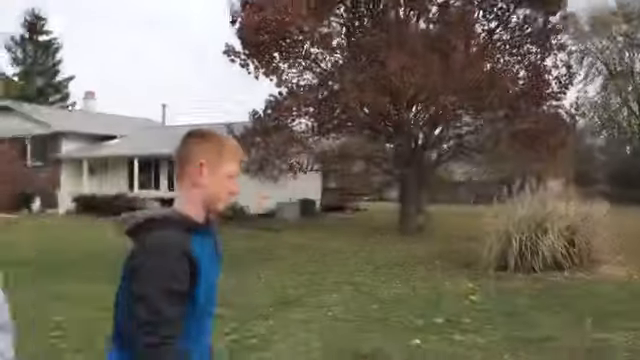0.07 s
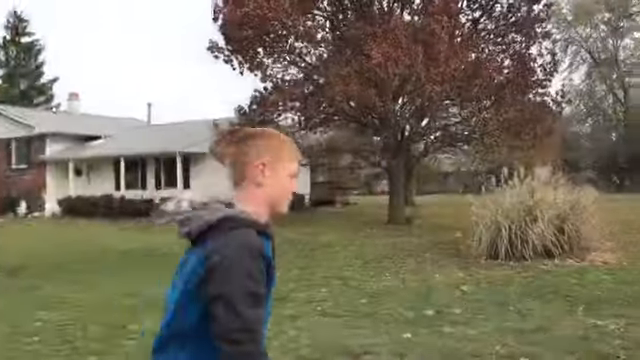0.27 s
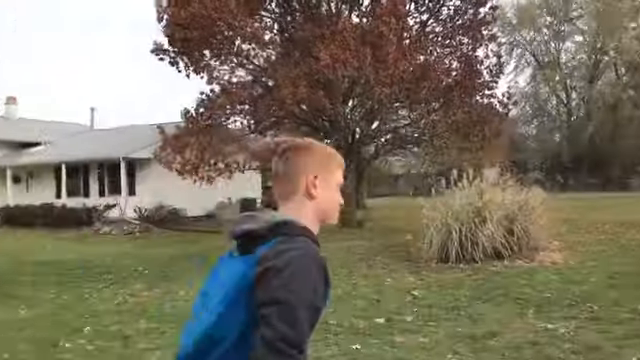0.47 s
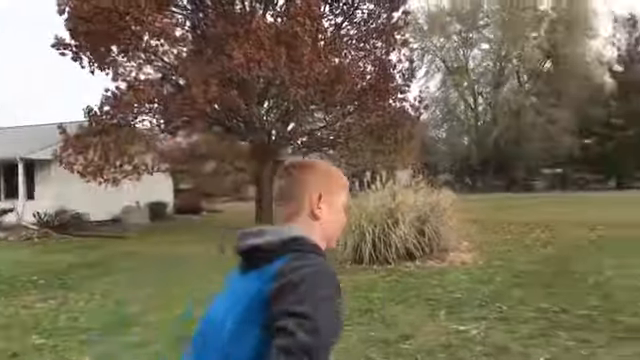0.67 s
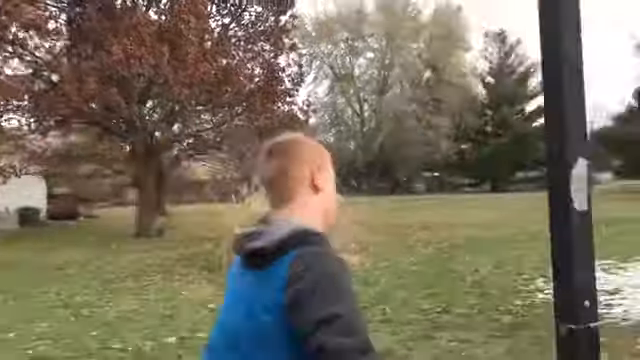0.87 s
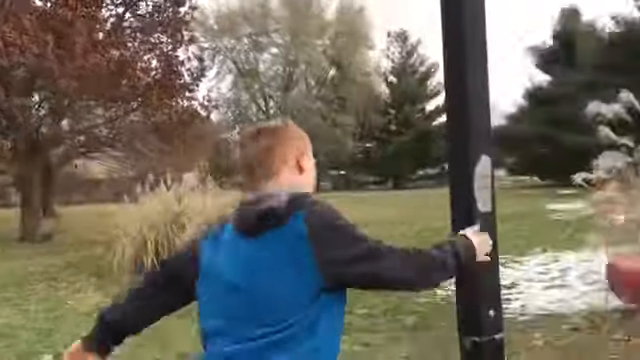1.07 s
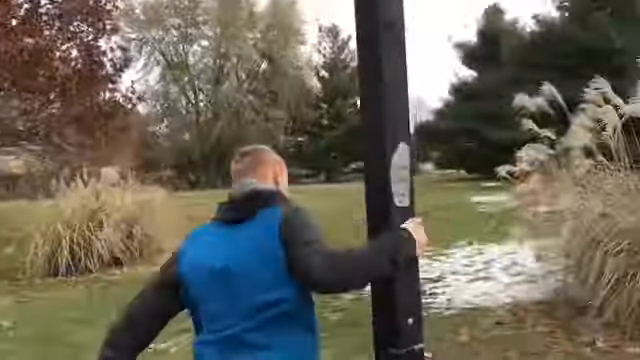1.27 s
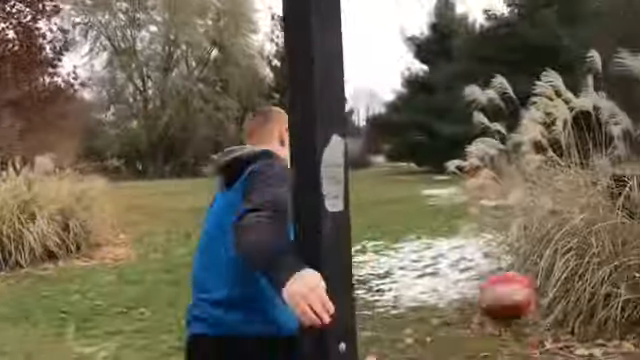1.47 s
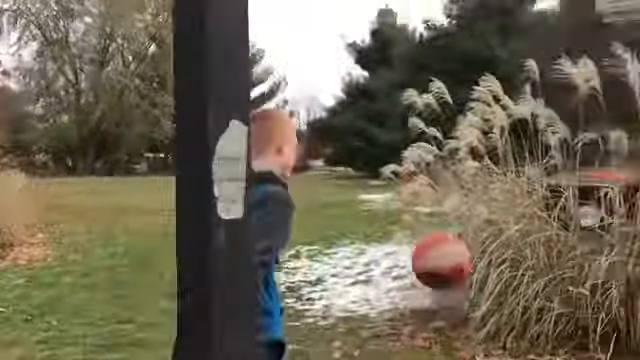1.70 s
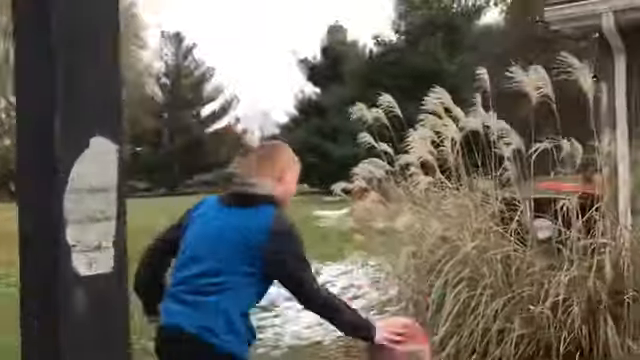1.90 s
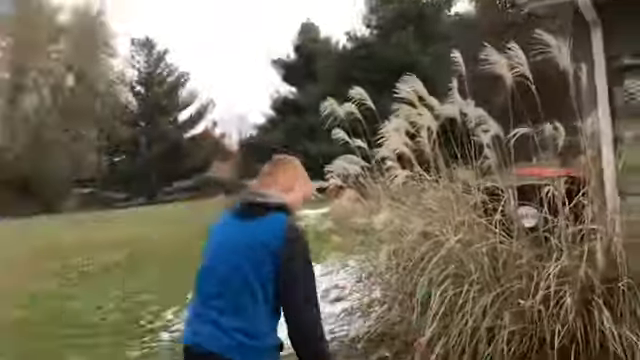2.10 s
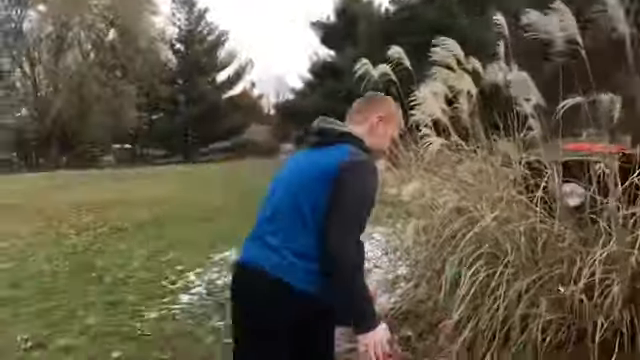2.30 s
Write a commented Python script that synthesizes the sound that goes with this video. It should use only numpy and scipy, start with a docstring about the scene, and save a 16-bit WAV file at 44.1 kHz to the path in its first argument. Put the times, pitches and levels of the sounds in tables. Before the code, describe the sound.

A ball slaps the ground outdoors as someone runs along through crackling leaves.

```python
"""A running step, and at 0.24 s a ball bounces close by in a yard: a sharp slap on a falling thump.
More steps and scuffs follow, with swishing clothes and dry leaves crackling underfoot.
The ball bounces again at 1.37 s and, two steps later, at 2.17 s, when the air in it rings loudest.
A last step and scuff end the run. All along, house and trees answer faintly over a low rumble of air."""
import sys
import numpy as np
from scipy import signal
from scipy.fft import rfft, irfft, next_fast_len
from scipy.io import wavfile
from scipy.ndimage import uniform_filter1d, map_coordinates

SR = 44100
rng = np.random.default_rng(int(sys.argv[2]) if len(sys.argv) > 2 else 0)


def digitize_waveform(pressure):
    """Quantize a signal to 16-bit integers and store it at the path in sys.argv[1].

    Rows of a 2-D input are taken as channels; values are limited to [-1, 1].
    """
    field = np.atleast_2d(pressure).T
    bounded = np.clip(field, -1, 1)
    quanta = np.round(bounded * 32767).astype(np.int16)
    wavfile.write(sys.argv[1], SR, quanta)


N = 108045
T = np.arange(SR // 4) / SR  # seconds within one short sound

# A fade time (t60) is how long a sound takes to drop by 60 dB.
# The ball's body. Each row: start in seconds, thump level in dB, starting pitch in Hz,
# fade time in seconds, boost of the ringing air inside in dB.
BOUNCE_THUMPS = [(0.2377, -11, 216, 0.056, -0.5), (1.3713, -13.5, 204, 0.055, -7),
                 (2.1691, -14.5, 205, 0.057, 4.5)]
# The air inside the ball. Each row: pitch in Hz, level in dB, fade time in seconds.
BALL_AIR_TONES = [(391, -37, 0.108), (750, -35, 0.04), (906, -40, .2), (1087, -41, 0.068),
                  (1340, -54, 0.03), (1783, -38.5, 0.12)]
# The ball's skin. Each row: start in seconds, hollow knock in Hz and dB, bright smack in Hz and dB,
# crack in dB, fizz in dB.
SKIN_SLAPS = [(0.2359, 1160, -15.5, 4070, -6, -3.5, -34), (.2462, 1300, -11.5, 3600, -40, -46, -44),
              (0.2616, 1080, -29, 4510, -12.5, -18, -49), (1.3696, 1110, -11, 2290, -7.5, -11, -14.5),
              (1.3807, 1390, -12, 2390, -11.5, -16.5, -22), (1.39, 1360, -40, 4070, -24, -21, -32),
              (1.4005, 1440, -32, 4060, -23, -26, -33), (2.026, 970, -27.5, 2020, -55, -29, -32.5),
              (2.1674, 1506, -7, 2920, -14, -17, -23.5), (2.1782, 1020, -15, 2700, -19, -13, -23),
              (2.186, 1690, -31, 3240, -19, -28, -45), (2.197, 950, -26, 2770, -36, -26, -45)]
# Footfalls. Each row: start in seconds, tap in dB and Hz, clop in dB, click in dB,
# thud in dB and Hz, delay of the thud in seconds.
FOOTFALLS = [(0.2097, -24.5, 1550, -21.5, -21.5, -23.5, 173, 0.0051),
             (0.609, -30, 1410, -27, -19.5, -25, 172, 0.0034),
             (0.9548, -27, 1510, -25, -27.5, -25.5, 178, 0.0038),
             (1.1601, -28, 1290, -31.5, -23.5, -23.5, 228, 0.00345),
             (1.7711, -35, 1485, -54, -34, -23, 227, 0.00332),
             (2.0260, -24.5, 1300, -24.5, -24.5, -31, 350, 0.0029),
             (2.2226, -39, 1210, -43, -42, -20.5, 253, 0.0014)]
# Brushing shoes. Each row: start in seconds, level in dB, length in seconds, low bump in dB.
SHOE_SCUFFS = [(0.267, -38, 0.0067, -25), (0.651, -47.5, 0.0091, -46), (.745, -43.5, 0.0053, -43),
               (0.892, -41, 0.017, -43), (0.913, -38, 0.0068, -28), (1.053, -42, 0.013, -47),
               (1.322, -48, 0.01, -37), (1.340, -34, 0.0033, -48), (1.346, -28.5, 0.006, -23),
               (1.457, -46.5, 0.026, -40), (1.493, -49.5, .012, -42.5), (1.744, -47.5, 0.021, -44.5),
               (1.805, -48.5, .015, -41.5), (2.046, -46.5, 0.0086, -48), (2.122, -49.5, 0.01, -42),
               (2.39, -45.5, 0.036, -45.5)]
# Leaves and twigs breaking. Each row: start in seconds, click in dB, crinkle in Hz and dB.
LEAF_SNAPS = [(0.0675, -43, 6060, -61), (0.1388, -34.5, 3740, -39), (0.508, -40, 2420, -41.5),
              (0.5756, -31.5, 2760, -42), (.649, -45, 1820, -38), (.672, -39, 2610, -38.5),
              (0.8303, -37.5, 4480, -40.5), (0.854, -45, 3400, -44), (0.896, -45, 870, -36),
              (.995, -48, 2270, -38.5), (1.198, -34, 2400, -36), (1.2369, -26, 2720, -27),
              (1.259, -32.5, 4800, -34), (1.272, -37.5, 3100, -35), (1.293, -46, 5200, -35),
              (1.34, -31, 1730, -35), (1.458, -52, 1600, -29.5), (1.806, -48, 2400, -42),
              (1.844, -59, 2610, -35.5), (1.868, -64, 2650, -39), (1.885, -63, 2580, -39.5),
              (1.920, -50, 4150, -46), (2.047, -65, 1260, -32), (2.2752, -39, 3300, -41)]
# The rustle of leaves. Each row: time in seconds, relative level in dB.
RUSTLE_LEVELS = [(0.0, -70), (0.12, -63.5), (0.29, -60.5), (0.47, -62), (0.61, -61), (1.17, -63),
                 (1.31, -57.5), (1.38, -55.5), (1.57, -63.5), (1.85, -60), (1.98, -64.5), (2.45, -63.5)]
# Swishing clothes. Each row: middle in seconds, level in dB, half length in seconds.
CLOTH_SWISHES = [(0.102, -55.5, 0.026), (0.658, -56, .02), (0.897, -53.5, .025), (1.213, -51.5, 0.035),
                 (1.348, -57.5, 0.02), (2.09, -60, 0.03), (2.3, -54.5, 0.022)]
# The yard's echo. Each row: frequency in Hz, fade time in seconds.
ECHO_FADE_TIMES = [(100, 0.75), (500, 0.4), (3000, 0.92), (6000, 0.97), (14000, 0.52)]

# Tone shapes make a sound dull or bright. Each row: frequency in Hz, boost or cut in dB.
CRACK_TONE = [(150, -32), (450, 0), (800, 5.5), (1500, 6.5), (2000, -18), (3000, 3.5), (4200, -2),
              (5500, -0.5), (7200, -4), (8500, -11.5), (16000, -21)]
FIZZ_TONE = [(2000, -22.5), (4700, 16), (6500, 8.5), (8500, 7.5), (12500, 8), (15000, 8), (16000, 6)]
CLICK_TONE = [(200, -3.5), (500, 5), (900, -17), (2000, -5), (3200, -2.5), (5000, -20), (7500, -34),
              (16000, -27)]
CLOP_TONE = [(100, 11), (400, -12), (850, 5.5), (1300, 7), (3000, -99), (16000, -21)]  # the hollow of the sole
SCUFF_TONE = [(100, -36), (300, 13), (500, 6.5), (1000, 3), (1600, -4.5), (3000, -12.5), (6000, -29),
              (16000, -31)]
BUMP_TONE = [(30, -38), (70, 15.5), (130, -2), (250, 10), (450, -33), (1000, -48)]
SNAP_TONE = [(300, -14.5), (1200, 3.5), (2600, 10.5), (4500, -5.5), (7000, -9), (10000, -1), (16000, -6.5)]
RUSTLE_TONE = [(300, -3), (1200, 5.5), (2700, 2.5), (5000, -3), (8500, -8), (16000, -11)]
CLOTH_TONE = [(1000, -19), (3500, -2), (7500, -4), (13000, -1.5), (16000, -12)]
TREE_TONE = [(60, 3.5), (150, 6.5), (500, 3), (1200, -7), (2200, -1), (4000, -3), (8000, -5.5),
             (16000, -13)]
WALL_TONE = [(80, 0), (200, -1), (400, 10.5), (1200, -2), (4000, 5), (16000, -2)]
AIR_TONE = [(25, -8), (60, 3), (120, 5.5), (200, -6.5), (300, -10.5), (450, -22.5), (640, -17.5),
            (1020, -14), (1790, -27), (3000, -25.5), (5500, -30.5), (16000, -35)]
MICROPHONE_TONE = [(20, -13), (31, -25), (42, 2), (55, 1), (8800, -0.5), (10200, -4), (11800, 0)]


def ball():
    """The body thumps, grit scatters and the air inside rings; the skin slaps the ground or a hand."""
    out = np.zeros(N)
    for start, db, hz, t60, ring_db in BOUNCE_THUMPS:
        add(out, start, amp(db) * thump(hz, end_hz=70.4, sag_s=0.008, hold_s=0.012, t60=t60))
        add(out, start, amp(-31) * fade(0.035) * noise(SNAP_TONE, len(T)))  # grit
        for air_hz, air_db, air_t60 in BALL_AIR_TONES:
            add(out, start, amp(air_db + ring_db) * ring(air_hz, air_t60, rough=0.07))
    for start, knock_hz, knock_db, smack_hz, smack_db, crack_db, fizz_db in SKIN_SLAPS:
        knock = amp(knock_db) * ring(knock_hz, t60=0.011, rough=0.64)
        smack = amp(smack_db) * ring(smack_hz, t60=0.0066, rough=1.0)
        crack = amp(crack_db) * burst(CRACK_TONE, t60=0.021, spike=1.1)
        fizz = amp(fizz_db) * burst(FIZZ_TONE, t60=0.021, spike=0.86)
        add(out, start, knock - smack + crack + fizz)
    return out


def steps():
    """The sole taps, then the weight lands with a thud."""
    out = np.zeros(N)
    for start, tap_db, tap_hz, clop_db, click_db, thud_db, thud_hz, delay in FOOTFALLS:
        tap = amp(tap_db) * ring(tap_hz, t60=0.024, rough=1.0)
        click = amp(click_db) * burst(CLICK_TONE, t60=0.021, spike=0.99)
        clop = amp(clop_db) * burst(CLOP_TONE, t60=0.09, spike=0.64)
        thud = amp(thud_db) * thump(thud_hz, 0.51 * thud_hz, sag_s=0.011, hold_s=0.0035, t60=0.024)
        add(out, start, tap + click + clop)
        add(out, start + delay, thud)
    return out


def scuffs():
    """Shoes brush the ground: a grainy swish over a low bump."""
    out = np.zeros(N)
    for start, db, length, bump_db in SHOE_SCUFFS:
        grit, grain_size = rng.standard_normal((2, len(T)))
        swish = amp(db) * unit(colour(grit * amp(2.1 * grain_size), SCUFF_TONE))
        bump = amp(bump_db) * noise(BUMP_TONE, len(T))
        age = T / (0.34 * length)  # loudest when this reaches 1
        add(out, start, (swish + bump) * age * np.exp(1 - age))
    return out


def leaves():
    """Dry leaves and twigs snap and crinkle over clumps of tiny crackles."""
    out = np.zeros(N)
    for start, db, hz, crinkle_db in LEAF_SNAPS:
        click = amp(db) * burst(SNAP_TONE, t60=0.016, spike=0.99)
        crinkle = amp(crinkle_db) * ring(hz, t60=0.012, rough=1.0)
        add(out, start, click + crinkle)
    grains = unit(ticks(N, per_second=900)) + 0.93 * rng.standard_normal(N)
    clumps = amp(2.2 * wobble(per_second=70))
    crackle = unit(colour(grains, RUSTLE_TONE) * clumps)
    rustle_db = 5 + np.interp(np.arange(N) / SR, *np.transpose(RUSTLE_LEVELS))
    return out + amp(rustle_db) * crackle


def clothes():
    """Fabric rubs in short, fluttering swells."""
    t = np.arange(N) / SR
    swells = sum(amp(db) * np.exp(-0.5 * ((t - middle) / half) ** 2) for middle, db, half in CLOTH_SWISHES)
    flutter = amp(5 * wobble(per_second=120))
    return swells * unit(noise(CLOTH_TONE, N) * flutter)


def yard(x):
    """Walls send back weak early echoes, and trees add a thin tail."""
    hz, t, bands = signal.stft(rng.standard_normal(SR), SR, nperseg=256)
    bands = bands * fade(along(ECHO_FADE_TIMES, hz)[:, None], t)  # each band fades at its own speed
    trees = signal.istft(bands, SR, nperseg=256)[1]
    trees = amp(-25) * colour(trees / np.linalg.norm(trees), TREE_TONE)
    walls = ticks(len(T), per_second=1200) * fade(0.2) * (T > 0.008)
    walls = amp(-20) * colour(walls / (np.linalg.norm(walls) + 1e-9), WALL_TONE)
    return signal.fftconvolve(x, trees)[:N] + signal.fftconvolve(x, walls)[:N]


def air():
    """The open air rumbles low and hisses faintly."""
    return amp(-51.5 + 0.27 * wobble(per_second=8.92)) * noise(AIR_TONE, N)


def thump(start_hz, end_hz, sag_s, hold_s, t60):
    """A low push whose pitch falls as the contact relaxes."""
    hz = end_hz + (start_hz - end_hz) * np.exp(-T / sag_s)
    rise = 1 - np.exp(-T / 0.00034)
    fall = fade(t60, np.maximum(T - hold_s, 0))
    return np.sin(2 * np.pi * np.cumsum(hz) / SR) * rise * fall


def ring(hz, t60, rough):
    """A fading tone that wanders more the rougher it is."""
    drift = rough * np.cumsum(rng.standard_normal(len(T))) * np.sqrt(hz / SR)
    drift = uniform_filter1d(drift, int(SR / hz))  # smooth over one cycle
    rise = 1 - np.exp(-4 * hz * T)
    return np.sin(2 * np.pi * hz * T + drift - drift[0]) * rise * fade(t60)


def burst(tone, t60, spike):
    """A hit: one pressure spike and a dying spray of noise."""
    x = rng.standard_normal(len(T)) * fade(t60)
    x /= np.linalg.norm(x)
    x[0] -= spike
    x = colour(x, tone)
    return x / np.linalg.norm(x) * np.sqrt(SR * 0.00034)  # the energy of a full-level 0.34 ms click


def noise(tone, n):
    """Steady noise with a tone shape."""
    return unit(colour(rng.standard_normal(n), tone))


def ticks(n, per_second):
    """Tiny clicks of random size at random times."""
    return (rng.random(n) < per_second / SR) * rng.standard_normal(n)


def wobble(per_second):
    """A smooth curve through random points."""
    return map_coordinates(rng.standard_normal(N // 100), [np.arange(N) * per_second / SR], mode="mirror")


def colour(x, tone):
    """Filter x with a tone shape."""
    size = 2 * next_fast_len(len(x))
    gain = amp(along(tone, np.fft.rfftfreq(size, 1 / SR)))
    cepstrum = irfft(np.log(gain), size)
    # Fold the filter forward in time, so nothing sounds before a hit.
    cepstrum[1:size // 2] *= 2
    cepstrum[size // 2 + 1:] = 0
    return irfft(rfft(x, size) * np.exp(rfft(cepstrum)), size)[:len(x)]


def along(points, hz):
    """Read between a table's rows on a log frequency scale."""
    row_hz, values = np.transpose(points)
    return np.interp(np.log(hz + 1), np.log(row_hz + 1), values)


def fade(t60, t=T):
    """Die away by 60 dB every t60 seconds."""
    return np.exp(-np.log(1000) * t / t60)


def amp(db):
    """Turn decibels into a gain."""
    return 10 ** (np.asarray(db) / 20)


def unit(x):
    """Scale to an average (rms) level of 1."""
    return x / np.sqrt(np.mean(x ** 2) + 1e-20)


def add(out, start, x):
    """Mix x into out from start seconds on."""
    part = out[round(start * SR):][:len(x)]
    part += x[:len(part)]


def scene():
    """The close sounds, their echo and the open air, in one channel."""
    near = ball() + steps() + scuffs() + leaves() + clothes()
    return (near + yard(near) + air())[None]


def record(dry):
    """A small microphone colours the sound; the recorder clips peaks and keeps only what is below 16 kHz."""
    clipped = np.clip(colour(dry[0], MICROPHONE_TONE)[None], -1, 1)
    size = next_fast_len(N + SR // 2)
    kept = np.fft.rfftfreq(size, 1 / SR) < 16000
    return irfft(rfft(clipped, size) * kept, size)[..., :N]


dry = scene()
out = record(dry)
digitize_waveform(out)
```